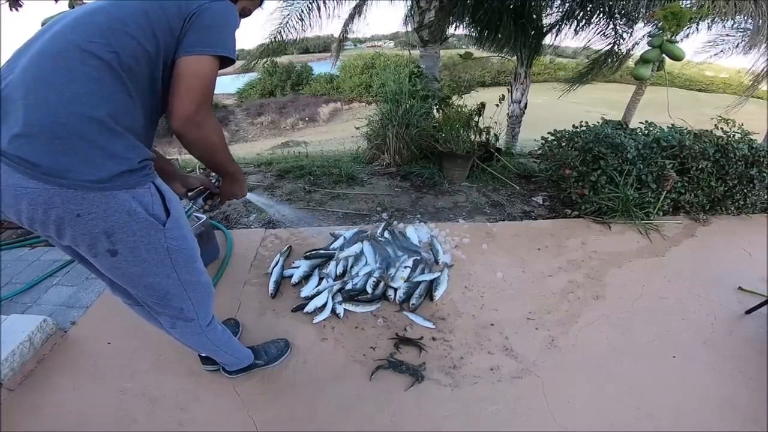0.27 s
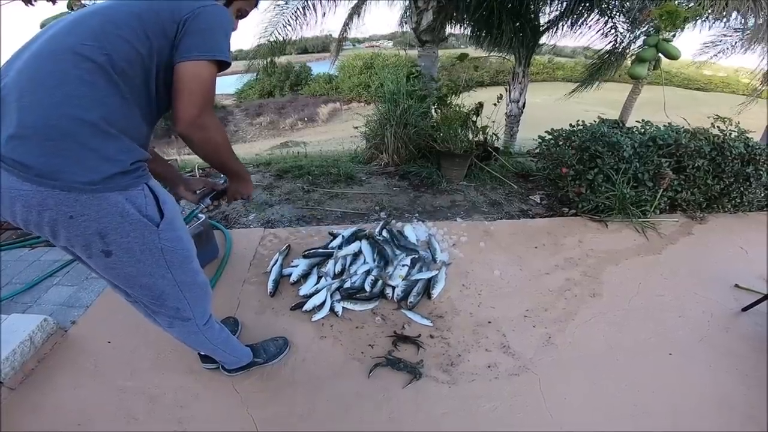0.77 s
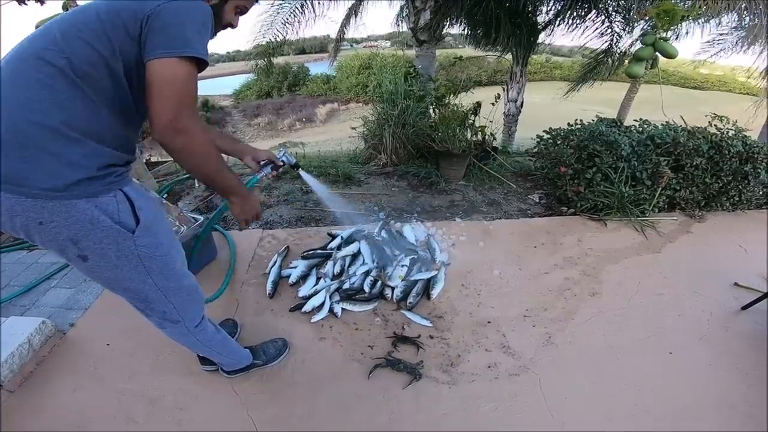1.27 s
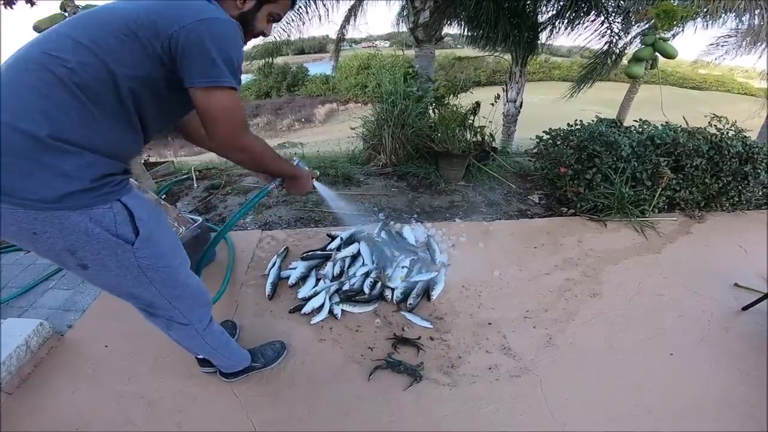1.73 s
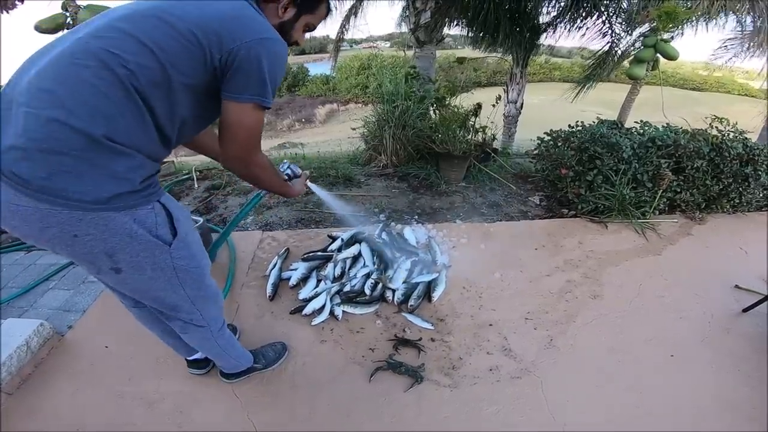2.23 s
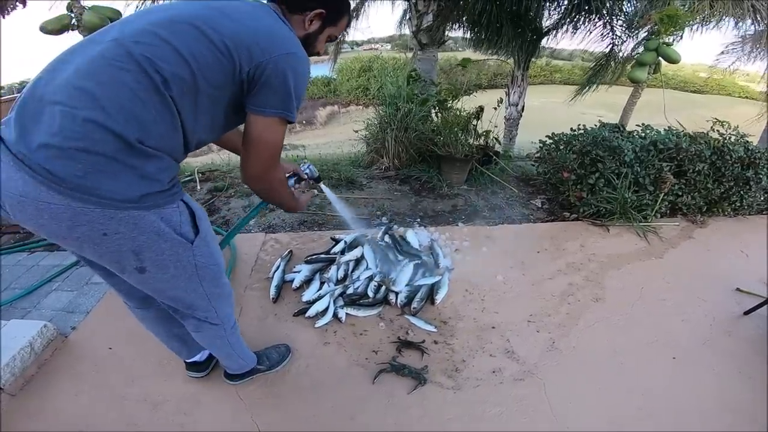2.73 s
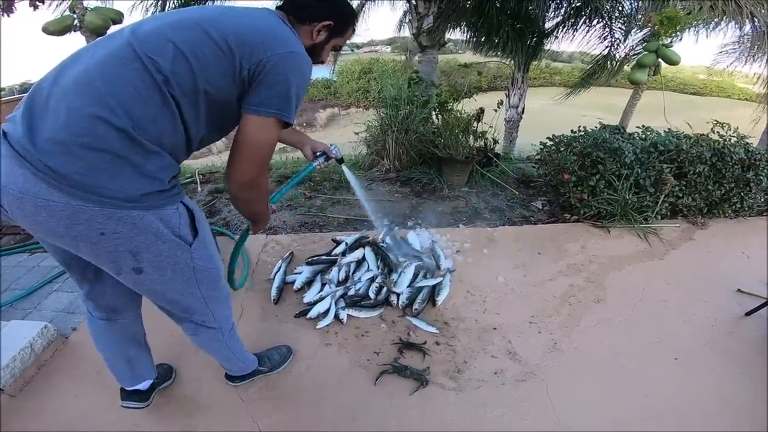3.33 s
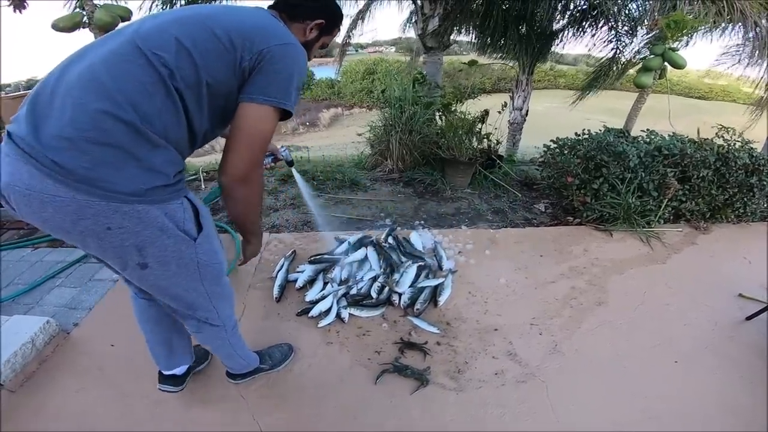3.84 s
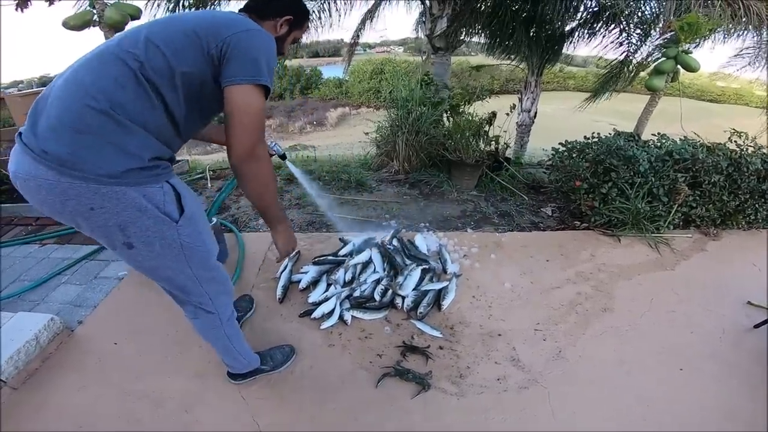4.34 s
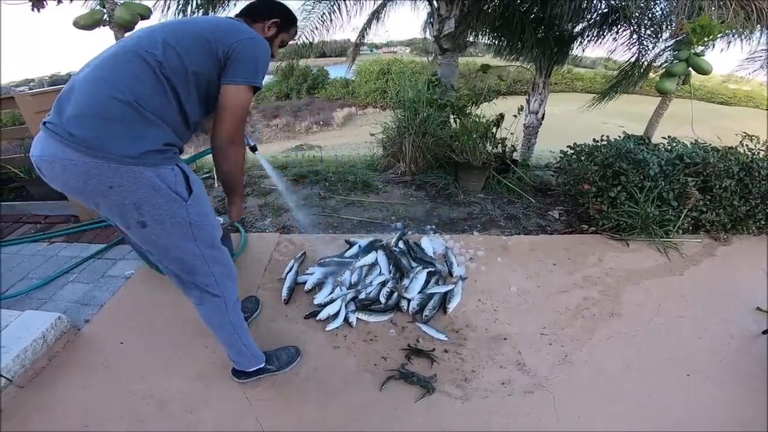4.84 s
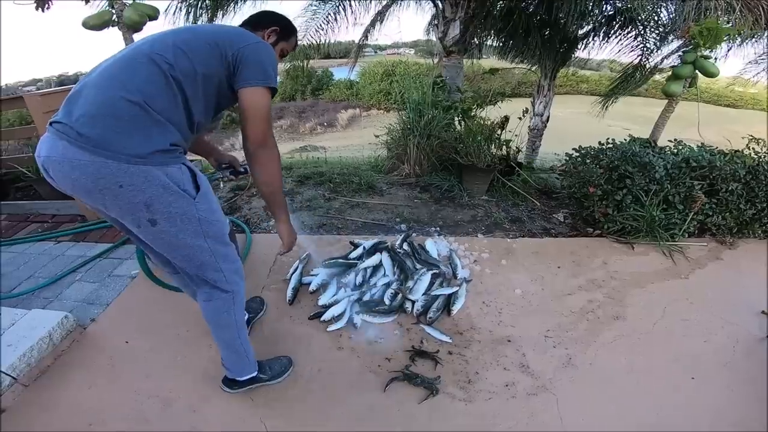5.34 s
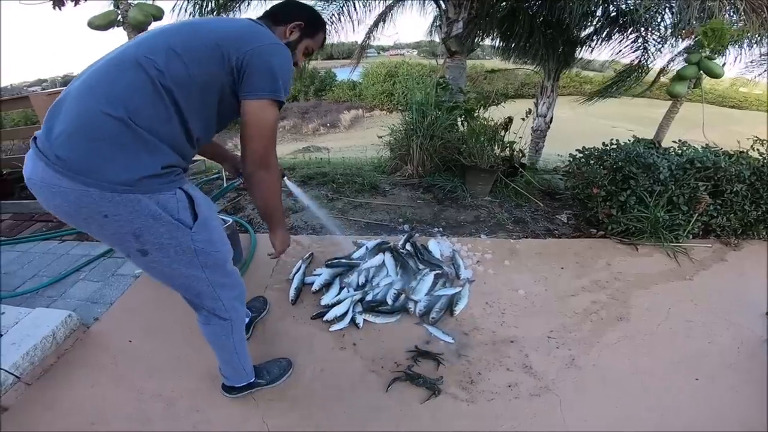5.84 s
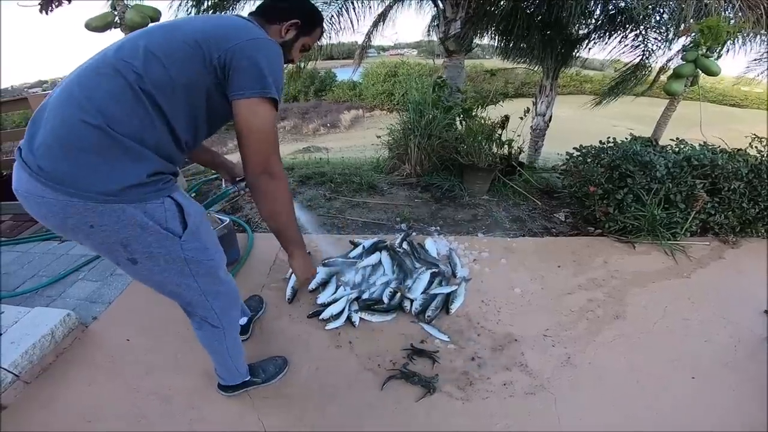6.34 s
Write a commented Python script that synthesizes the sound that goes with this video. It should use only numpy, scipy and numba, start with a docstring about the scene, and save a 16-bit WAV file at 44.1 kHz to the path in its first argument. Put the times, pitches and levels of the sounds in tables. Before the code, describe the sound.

A steady water jet hisses and splatters on wet fish and concrete, dry and open with no room echo. It soon dips sharply with a brief buzzing valve squeak, fizzes, and snaps back stronger. The tone then wavers as the aim swings, with hollow gurgles and small ticks of heavy drops. Low wind flutters and bumps irregularly against the nearby microphone throughout, and the spray is still running at the end.

```python
"""Hosing down fish on a patio

A hose nozzle sprays a pile of fish on a concrete patio, a couple of metres from the microphone in the open air.
Filtered random drops hiss and patter; resonances gurgle where the jet finds gaps, and fat drops tick.
The trigger is let go for a moment: the valve squeaks as a chopped buzz, then the nozzle fizzes back.
Close to the microphone, low filtered noise makes the breeze rumble and flutter and its eddies thump."""
import sys
import numpy as np
from scipy import signal
from scipy.fft import rfft, irfft
from scipy.io import wavfile
from scipy.ndimage import uniform_filter1d
from numba import njit

SR = 44100
rng = np.random.default_rng(int(sys.argv[2]) if len(sys.argv) > 2 else 0)


def file_out(sig):
    """Save sig as 16-bit WAV at sys.argv[1]."""
    # one column per channel
    cols = np.atleast_2d(sig).T
    # limit, then scale
    lim = np.clip(cols, -1, 1)
    pcm = np.round(lim * 32767).astype(np.int16)
    wavfile.write(sys.argv[1], SR, pcm)


N = 291056
TIME = np.arange(N) / SR  # s
FREQ = np.maximum(np.arange(N // 2 + 1) * SR / N, 1)  # Hz

# The trigger is half held, let go for a moment, then squeezed fully. Each row: time in seconds, flow in dB.
TRIGGER = [(0.0, -6.5), (.8, -7.5), (.88, -15.5), (.925, -18.5), (.96, -20), (1.0, -16), (1.04, -10.5),
           (1.067, -7), (1.076, -2), (1.12, 1)]
# How squarely the swinging jet strikes the pile. Each row: time in seconds, impact in dB.
IMPACT = [(0.0, 0.5), (.25, 1.5), (.5, 1), (1.3, -.5), (1.87, -.5), (2.3, -1), (2.85, -0.2118),
          (2.96, 1.6533), (3.13, -0.5), (3.42, -0.5), (3.64, 2), (4.11, -2), (4.23, 1.3427), (4.35, -2.5),
          (4.62, 1), (4.8, -3.5), (5.01, 0.5), (5.1, -4), (5.25, 1), (5.42, .5), (5.5, 2.4), (5.64, 0),
          (5.92, 1), (6.12, -3), (6.21, 1), (6.6, 0.9056)]
# What the jet lands on, before flow, impact and trims. Each row: time in seconds, fine mist in dB,
# splatter in the pile in dB, slap on flat wet surfaces in dB.
SURFACE = [(0.0, -51, -49.5, -61.5), (.42, -52, -47.5, -63.5), (.72, -53, -42.5, -57), (1.1, -52, -44, -51),
           (1.25, -52, -43.5, -50.5), (1.5, -51, -43.5, -53), (1.65, -54, -43.5, -57),
           (2.0, -53.5, -41, -54), (2.25, -57, -46.5, -55.5), (2.45, -56.5, -45, -52.5),
           (2.7, -55, -43, -60), (3.0, -54.5, -44.5, -57.5), (3.3, -53, -48.5, -59), (3.7, -56, -49, -57.5),
           (4.0, -53.5, -44.5, -60), (4.3, -55.5, -48.5, -58), (4.6, -56, -46.5, -57.5),
           (4.8, -54.5, -44, -57.5), (5.15, -55, -43, -55.5), (5.5, -54, -47, -58),
           (5.75, -55, -46.5, -59.5), (6.35, -52, -43, -51.5), (6.6, -51.5, -47, -51.5)]
# Outlines of the four voices of the spray. Each row: frequency in Hz, level in dB.
HISS_COLOUR = [(1180, -33), (2000, -5), (2410, -2.3083), (3200, 0.7694), (4300, -3), (5910, -9.5),
               (7500, -25), (9750, -54), (16500, -120)]
MIST_COLOUR = [(4800, -20), (6000, -2.5), (7000, -3), (8000, -4.5), (8850, 0), (9500, -3.5), (10400, -5),
               (11500, -2.5), (12500, -5.5), (13500, -13.5), (14600, -19)]
SPLATTER_COLOUR = [(700, -23.5), (1100, -6), (1500, 0.5), (1950, 1), (2400, -2), (3500, -5.5)]
SLAP_COLOUR = [(150, 6.5), (350, -4), (600, -3.5), (850, -1.5), (1100, -0.5), (1500, -12), (2500, -44.5)]
# The brightest part of the hiss moves with the aim. Each row: time in seconds, centre in Hz before wander.
HISS_CENTRE = [(0.0, 3686), (.25, 3491), (0.53, 3031), (1.3, 3313), (2.0, 3045), (2.74, 2996), (3.1, 3453),
               (3.75, 3152), (3.95, 3465), (4.08, 3036), (4.43, 3366), (4.59, 2902), (5.0, 3336),
               (5.25, 3004), (5.5, 3699), (5.62, 3300), (5.73, 3787), (5.9, 3034), (6.6, 3194)]
# A band that drops out of the splash. Each row: time in seconds, centre in Hz, depth from 0 to 1.
NOTCH = [(2.41, 1350, 0.09), (2.45, 1346, 0.44), (2.68, 1255, 0.25), (2.8, 1353, 0.07), (3.83, 2304, 0.12),
         (3.89, 2424, 0.58), (3.95, 2725, 0.7), (4.0, 2753, 0.35), (4.05, 2464, 0.4), (4.1, 2351, 0.28),
         (4.14, 2300, 0.02), (4.29, 2020, 0), (4.34, 1952, 0.43), (4.41, 1902, 0.48), (4.47, 1900, 0.03)]
# The jet splashes and drums in a gap between fish. Each row: middle in seconds, length in seconds,
# cavity note in Hz before sloshing, resonance width in Hz, level in dB.
HOLLOWS = [(.08, 0.03804, 2296, 500, -50), (0.244, 0.0326, 3361, 600, -49), (0.351, 0.04, 2327, 500, -49.5),
           (0.661, 0.049, 2011, 500, -49.5), (1.263, 0.058, 850, 200, -54),
           (1.858, 0.05018, 4601, 903.6, -47), (2.415, 0.0313, 1901, 300, -44),
           (2.511, 0.1133, 1837, 320, -48), (2.66, 0.1044, 2046, 599.6, -45.5),
           (2.777, .07, 2217, 599.5, -47.5), (2.815, 0.04063, 1103, 150, -51),
           (2.94, 0.06967, 2398, 500, -44.5), (2.963, .04, 3598, 700, -43), (3.012, 0.065, 4310, 500, -44),
           (3.478, 0.08582, 2312, 600, -45), (3.7, 0.081, 3127, 450, -39.5),
           (3.787, 0.028, 2088, 350, -44.5), (3.908, 0.0705, 1990, 400, -46),
           (3.96, 0.0828, 4897, 1000, -49), (3.994, 0.07542, 1535, 400, -49),
           (3.988, 0.0907, 3345, 450.4, -44), (4.052, 0.045, 1874, 499, -44),
           (4.145, 0.03082, 2387, 900, -42.5), (4.19, 0.04506, 1994, 250, -40.5),
           (4.217, 0.06031, 3478, 1501, -38.5), (4.255, 0.03668, 1940, 350, -41),
           (4.569, .09, 2651, 400, -49), (4.7, 0.055, 2878, 600, -41), (4.711, 0.0645, 1512, 450, -45.5),
           (5.205, 0.03011, 1574, 479, -44), (5.252, 0.04643, 1374, 600, -41),
           (5.305, 0.0412, 1396, 500, -45), (5.38, 0.06985, 1374, 300, -47.5),
           (5.506, 0.08186, 3889, 1401, -41.5), (5.593, 0.02906, 2000, 1000, -40.5),
           (5.598, 0.0694, 1308, 519.4, -44.5), (5.6, 0.08, 947.5, 180, -52),
           (5.735, 0.07053, 3971, 1501, -42.5), (5.926, 0.049, 4877, 800, -46),
           (5.94, 0.04994, 1598, 600.5, -48)]
# Single fat drops and ticks. Each row: start in seconds, peak in dB, ring in Hz, resonance width in Hz.
TICKS = [(0.077, -31, 2935, 2000), (.1831, -33.5, 3600, 1500), (0.2435, -25.5, 2652, 1800),
         (.255, -32, 3297, 1000), (0.338, -35.5, 2315, 1400), (.6525, -32.5, 1995, 1000),
         (0.7565, -34.5, 3005, 1500), (.862, -47.5, 10500, 5000), (.874, -49, 10500, 5000),
         (.893, -50.5, 10500, 5000), (0.9651, -35.5, 5285, 5498), (1.079, -30.5, 3215, 3013),
         (1.751, -27, 3200, 2000), (1.8318, -26.5, 3605, 2500), (2.2399, -29.5, 3000, 2000),
         (4.5423, -29.5, 3030, 1990), (4.823, -28.5, 3211, 2000), (5.665, -26, 3305, 1500),
         (6.148, -30, 3000, 2000)]
# The closing valve. Each row: time in seconds, pitch in Hz before jitter, squeak in dB,
# rush of water in dB, whistle in dB.
VALVE = [(.812, 676, -68.5, -66, -90), (.824, 685.8, -44, -59.5, -75), (.835, 684.6, -41.5, -49, -64),
         (.847, 691.8, -42.5, -45, -51), (.854, 705.4, -55, -51.5, -52), (.865, 710.5, -80, -72.5, -78)]
# Outline of the valve's squeak. Each row: frequency in Hz, level in dB.
SQUEAK_COLOUR = [(680, -6.5), (1370, -0.5), (2050, -6), (2730, -5.5), (3400, -7), (4150, -13), (4850, -11),
                 (5500, -12), (6200, -14.5), (6900, -11), (7600, -19.5), (9000, -17.5), (13000, -31.5)]
# The barely open nozzle. Each row: frequency in Hz, level in dB.
FIZZ_COLOUR = [(1800, -8), (2700, 5.5), (4000, -2.5), (5500, 2.5), (8700, -10), (12000, -26)]
# How loud the nozzle fizzes. Each row: time in seconds, level in dB.
FIZZ_LEVEL = [(.86, -89.5), (.9, -70.5), (.96, -67.5), (.99, -55.5), (1.06, -53), (1.13, -90.5)]
# The breeze at the microphone. Each row: time in seconds, level in dB.
BREEZE = [(0.0, -38), (.4, -46.5), (.62, -50), (1.18, -51.5), (1.55, -42), (1.9, -44.5), (2.15, -38),
          (2.6, -42.5), (3.25, -42.5), (3.65, -41.5), (4.2, -39), (4.38, -46.5), (4.65, -41.5),
          (5.5, -43.5), (6.1, -51.5), (6.35, -55), (6.6, -49.5)]
# Outlines of the wind's rumble and flutter. Each row: frequency in Hz, level in dB.
RUMBLE_COLOUR = [(10, -5.5), (22, -0.5), (55, 2.5), (85, -3.5), (120, -18.5), (200, -30.5), (400, -40)]
FLUTTER_COLOUR = [(50, -5.5), (110, 4), (160, 2.5), (205, -3.5), (260, -15), (330, -23), (500, -30),
                  (900, -47)]
# Eddies that hit the microphone. Each row: middle in seconds, length in seconds, level in dB, upper edge in Hz.
EDDIES = [(0.084, .05, -39.5, 90.2), (0.29, .025, -33, 190), (.371, 0.03, -33, 135.2),
          (0.529, .03, -43, 107.5), (0.736, .02, -43.5, 156.9), (0.859, .02, -43.5, 150),
          (.975, .028, -35, 186.9), (1.099, .025, -39, 149.8), (1.31, .05, -41.5, 199.4),
          (1.476, .025, -30.5, 127.4), (1.667, .04, -34.5, 195.1), (1.83, .025, -38, 150),
          (2.065, 0.039, -29.5, 179.4), (2.128, 0.048, -29, 90.57), (2.201, .04, -33.5, 154.7),
          (2.302, .022, -28.5, 223.7), (2.338, .028, -32.5, 180.3), (2.391, 0.025, -32, 192.2),
          (2.5, .02, -35, 69.66), (2.551, .06, -40.5, 179.8), (2.73, 0.02, -26.5, 113),
          (2.789, .02, -37, 127.9), (2.951, .028, -32, 220), (3.104, 0.032, -32, 169.7),
          (3.39, .02, -37, 179.7), (3.442, 0.03, -34, 221.6), (3.489, .035, -37, 180.6),
          (3.562, .03, -34, 85.98), (3.618, .018, -28.5, 239.1), (3.652, .035, -34, 220.6),
          (3.674, .022, -31.5, 100.2), (3.716, .025, -29.5, 230.9), (3.74, .016, -30, 224.7),
          (3.853, .025, -40.5, 139.8), (3.919, 0.026, -28, 70.9), (4.078, .05, -39, 90.48),
          (4.274, 0.045, -34.5, 185.9), (4.46, .021, -29.5, 228.8), (4.669, .03, -29.5, 151.6),
          (4.752, .025, -34, 110.1), (4.861, 0.04, -31.5, 151.9), (5.043, .025, -39, 180),
          (5.157, .04, -37, 94.8), (5.273, .03, -36.5, 74.88), (5.464, 0.028, -31.5, 180),
          (5.543, 0.06, -34, 150.4), (5.772, .022, -41.5, 169.4), (5.923, .03, -40.5, 129.5),
          (6.227, .022, -41.5, 208.5), (6.584, .03, -40.5, 175)]
# Air tearing at the microphone port. Each row: frequency in Hz, level in dB.
TEAR_COLOUR = [(300, -5.5), (480, 2), (700, -9), (1000, -24.5)]

HISS_DB = -40.5  # at 0 dB of flow and impact
HISS_WIDTH_HZ, HISS_LIFT = 1337.5, 0.447  # the bright part: width, gain
# dB gained by each voice of the spray per dB of flow and per dB of impact
MIST_PER_FLOW, SPLATTER_PER_FLOW, SLAP_PER_FLOW = 0.891, 0.7509, 0.287
MIST_PER_IMPACT, SPLATTER_PER_IMPACT, SLAP_PER_IMPACT = 0.688, 0.643, 0.227
RUMBLE_DB, FLUTTER_DB = 0, -11  # against the breeze
CALM_FLUTTER_DB = -56.5  # what never dies down
TEAR_DB, TEAR_EDGE_HZ = -21, 232.82  # for an eddy with this upper edge; higher edges tear more
# the gust around each eddy: seconds until its power falls to 1/e, levels against the eddy
GUST_S, GUST_RUMBLE_DB, GUST_FLUTTER_DB = 0.040037, -12, -10.5
TOP_HZ = 14700  # upper limit of what the microphone chain passes


def spray(bubble_db=-13, clump_db=0.6237, wander=0.071):
    """The jet breaks into clumps of drops: small ones hiss, large ones splatter and slap, with flow and aim."""
    flow, impact = curves(TRIGGER)[0], curves(IMPACT)[0]
    mist_db, splatter_db, slap_db = curves(SURFACE)
    mist_db = mist_db + MIST_PER_FLOW * flow + MIST_PER_IMPACT * impact
    splatter_db = splatter_db + SPLATTER_PER_FLOW * flow + SPLATTER_PER_IMPACT * impact + 0.5 * walk(14)
    slap_db = slap_db + SLAP_PER_FLOW * flow + SLAP_PER_IMPACT * impact + 0.88 * walk(14)
    clumps_db = clump_db * walk(45) + 0.5307 * walk(220)
    fine = glance(drops(rate=6000, spread_db=0.5, wash=0.689))
    coarse = glance(drops(rate=1400, spread_db=2, wash=0.7605))

    hiss = colour(fine, HISS_COLOUR)
    centre = curves(HISS_CENTRE)[0] * np.exp(wander * walk(25))
    hiss = unit(hiss + HISS_LIFT * sweep(hiss, centre, float(HISS_WIDTH_HZ)))
    hiss = hiss * undb(HISS_DB + flow + impact + clumps_db)

    mist = colour(drops(rate=6000, spread_db=6, wash=0.5887) + fine, MIST_COLOUR)
    mist = mist * undb(mist_db + 0.506 * clumps_db + 0.5836 * walk(120) + 1.0569)

    splatter = colour(coarse, SPLATTER_COLOUR) + undb(bubble_db) * bubbles()
    splatter = splatter * undb(splatter_db + clumps_db + walk(60) - 1.5)

    slap = colour(drops(rate=900, spread_db=3, wash=0.8927), SLAP_COLOUR)
    slap = slap * undb(slap_db + clumps_db + 2.5)
    return pile(hiss + mist + splatter + slap)


def drops(rate, spread_db, wash):
    """Impacts at random moments (rate per second) and of scattered size, over a wash of tiny drops."""
    scatter_db = spread_db * np.clip(rng.standard_normal(N), -2, 2)
    size = rng.choice([-1, 1], N) * undb(scatter_db)
    impacts = unit(size * (rng.random(N) < rate / SR))
    return unit(impacts + wash * rng.standard_normal(N))


def glance(x, lag_s=0.00052763, wander=0.31967, share=0.19087):
    """A reflection off the wet pile; its lag wanders as the jet moves and shifts the colour of the hiss."""
    lag = lag_s * np.exp(wander * walk(4))
    return unit(x + share * np.interp(TIME - lag, TIME, x))


def bubbles(count=900, low_hz=1100, high_hz=4800, cycles=9, glide=0.1071, spread_db=4):
    """Air trapped in the film of water rings briefly and rises in pitch."""
    out, t = np.zeros(N), TIME[:SR // 30]
    for when, pitch, size in rng.random((count, 3)):
        hz = low_hz * (high_hz / low_hz) ** pitch
        age = t * hz / cycles  # in decay times
        tone = np.sin(2 * np.pi * hz * t * (1 + glide * age / 2))
        add(out, when * N / SR, undb(2 * spread_db * size) * np.exp(-age) * tone)
    return unit(out)


def pile(water, width_hz=650):
    """Where the jet slides between the fish, a moving band drops out of the splash."""
    hz, depth = curves(NOTCH)
    return water - np.clip(depth, 0, 1) * sweep(water, hz, float(width_hz))


def hollows(rate=900, wobble=0.04455, gulp_db=2):
    """Drops ring the air in a wet gap; sloshing water bends the note and breaks it into gulps."""
    out, patter = np.zeros(N), drops(rate, spread_db=8, wash=0.487)
    slosh, gulps = np.exp(wobble * walk(70)), undb(gulp_db * walk(90))
    for middle, length, hz, width, db in HOLLOWS:
        part = rng.integers(N - SR) + np.arange(SR // 2)  # a random half second of patter
        centre = hz * slosh[part]
        cavity = sweep(patter[part], centre, float(width))
        cavity = sweep(cavity, centre, float(width))
        add(out, middle - length, undb(db) * swell(cavity * gulps[part], length))
    return out


def ticks(decay_s=0.00145):
    """A fat drop bursts within a few milliseconds: decaying random pulses through a double resonance."""
    out, t = np.zeros(N), TIME[:SR // 20]
    for start, db, hz, width in TICKS:
        crackle = rng.choice([-1, 1], len(t)) * np.exp(-t / decay_s)
        burst = ring(ring(crackle, hz, width), hz, width)
        add(out, start, undb(db) * burst / np.abs(burst).max())
    return out


def valve(jitter=0.003004, uneven_db=1.5, whistle_hz=4890, whistle_jitter=0.00612, count=18):
    """The seal chatters as the gap narrows and chops the flow into a rough squeak; the last slit whistles."""
    hz, db, rush_db, whistle_db = curves(VALVE)
    phase = 2 * np.pi * np.cumsum(hz * (1 + jitter * walk(900))) / SR
    buzz = np.zeros(N)
    for k in range(1, count + 1):
        harmonic = np.cos(k * phase + rng.uniform(0, 2 * np.pi))
        buzz += harmonic * undb(uneven_db * (k > 2) * walk(150.53))  # the lowest two stay even
    chopped = rng.standard_normal(N) * (1 + 0.601 * np.cos(phase))
    rush = colour(chopped, [(2000, -14), (5500, 5), (8000, -3.5), (12000, -20)])
    whistle_phase = 2 * np.pi * np.cumsum(whistle_hz * (1 + whistle_jitter * walk(900))) / SR
    whistle = unit(np.sin(whistle_phase))
    sounding = (TIME > VALVE[0][0]) & (TIME < VALVE[-1][0])
    squeak = colour(buzz, SQUEAK_COLOUR) * undb(db)
    return sounding * (squeak + rush * undb(rush_db) + whistle * undb(whistle_db))


def nozzle():
    """Water fizzes in the barely open nozzle as the trigger is squeezed again."""
    return colour(rng.standard_normal(N), FIZZ_COLOUR) * undb(curves(FIZZ_LEVEL)[0])


def wind(flicker_db=3.5, waver_db=1.4544):
    """The breeze rumbles and flutters in quick bunches; eddies thump and tear in short gusts that lift both."""
    breeze = undb(curves(BREEZE)[0])
    gust_power = np.zeros(N)
    for middle, _, db, _ in EDDIES:
        gust_power += undb(db) ** 2 * np.exp(-np.minimum(((TIME - middle) / GUST_S) ** 2, 20))
    gusts = np.sqrt(gust_power)
    rumble_level = np.hypot(breeze * undb(RUMBLE_DB), gusts * undb(GUST_RUMBLE_DB))
    flutter_level = np.hypot(breeze * undb(FLUTTER_DB), gusts * undb(GUST_FLUTTER_DB))
    flutter_level = np.hypot(flutter_level, undb(CALM_FLUTTER_DB))
    bunches = undb(flicker_db * walk(45))
    rumble = steady(colour(rng.standard_normal(N), RUMBLE_COLOUR), 0.06598)
    rumble = rumble * np.sqrt(bunches) * undb(waver_db * walk(12)) * rumble_level
    flutter = steady(colour(rng.standard_normal(N), FLUTTER_COLOUR), 0.036375)
    return rumble + flutter * bunches * flutter_level + eddies()


def eddies():
    """Each eddy presses on the microphone as a low thump, and the air tears at the port with that pressure."""
    out, tearing = np.zeros(N), colour(rng.standard_normal(N), TEAR_COLOUR)
    for middle, length, db, edge_hz in EDDIES:
        band = signal.butter(2, [38, edge_hz], "band", fs=SR, output="sos")
        lowpass = signal.butter(2, 1.1794 * edge_hz, fs=SR, output="sos")
        pressure = signal.sosfilt(band, rng.standard_normal(SR // 2))
        pressure = steady(signal.sosfilt(lowpass, pressure), 0.019048)
        tear = np.roll(tearing, rng.integers(N))[:SR // 2] * np.abs(pressure)
        tear = tear * undb(TEAR_DB) * (edge_hz / TEAR_EDGE_HZ) ** 2
        add(out, middle - length, undb(db) * swell(pressure + tear, length))
    return out


def undb(db):
    """Decibels to gain."""
    return 10 ** (np.asarray(db) / 20)


def unit(x):
    """Scale to an rms of one."""
    return x / np.sqrt(np.mean(x ** 2))


def curves(table):
    """Each column after the time as a value per sample, joined by straight lines."""
    s, *columns = np.transpose(table)
    return [np.interp(TIME, s, c) for c in columns]


def colour(x, points):
    """Filter through a (Hz, dB) outline that falls 24 dB per octave beyond its ends; rms of one."""
    hz, db = np.transpose(points)
    octaves_outside = np.abs(np.log2(FREQ / np.clip(FREQ, hz[0], hz[-1])))
    gain_db = np.interp(np.log(FREQ), np.log(hz), db) - 24 * octaves_outside
    return unit(irfft(rfft(x) * undb(gain_db), N))


def ring(x, hz, width):
    """One fixed resonance, width in Hz."""
    return signal.lfilter(*signal.iirpeak(min(hz, SR / 3), hz / width, fs=SR), x)


@njit
def sweep(x, hz, width):
    """A resonance whose centre may move every sample: a state-variable bandpass, width in Hz."""
    y, band, low = np.empty(len(x)), 0., 0.
    for i in range(len(x)):
        g, k = np.tan(np.pi * hz[i] / SR), width / hz[i]
        v = (band + g * (x[i] - low)) / (1 + g * (g + k))
        band, low, y[i] = 2 * v - band, low + 2 * g * v, k * v
    return y


def walk(rate):
    """Random levels held 1 / rate s and smoothed twice; rms of one."""
    k = max(int(SR / rate), 2)
    held = np.repeat(rng.standard_normal(N // k + 1), k)
    return unit(uniform_filter1d(uniform_filter1d(held, k), k)[:N])


def steady(x, seconds):
    """Even out slow swells, leaving the quick irregular motion."""
    return x / np.sqrt(uniform_filter1d(x ** 2, max(int(seconds * SR), 2)) + 1e-9)


def swell(x, length):
    """A smooth rise and fall over twice the given length, whose loud part lasts about that length."""
    size = int(2 * length * SR)
    window = np.hanning(size)
    burst = x[-size:] * window
    return burst * np.sqrt(np.sum(window ** 2) / np.sum(burst ** 2))


def add(out, s, sound):
    """Mix a sound in from time s."""
    start = max(int(s * SR), 0)
    out[start:start + len(sound)] += sound[:N - start]


def scene():
    """One microphone hears water and wind, the same in both ears."""
    sound = spray() + hollows() + ticks() + valve() + nozzle() + wind()
    return np.array([sound, sound])


def record(dry, rolloff_hz=12900):
    """The microphone rolls off in the top treble and a steep filter cuts the rest."""
    rolloff = signal.butter(6, min(rolloff_hz, TOP_HZ), fs=SR, output="sos")
    cut = signal.ellip(8, .2, 70, TOP_HZ, fs=SR, output="sos")
    return signal.sosfilt(cut, signal.sosfilt(rolloff, dry))


dry = scene()
out = record(dry)
file_out(out)
```